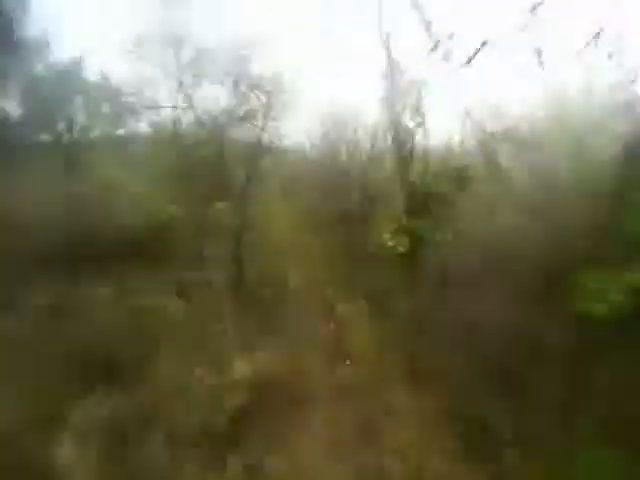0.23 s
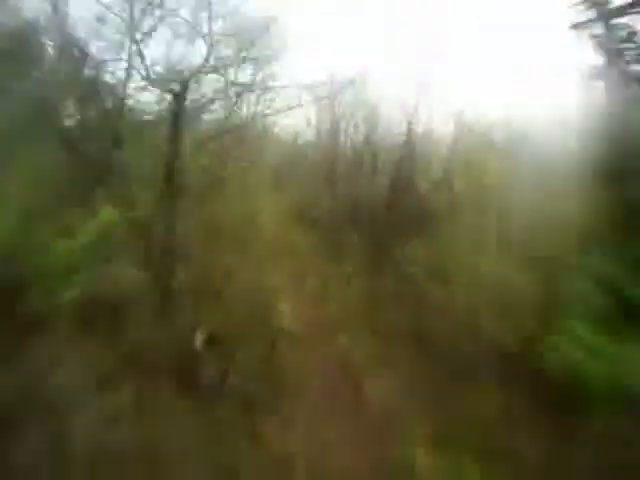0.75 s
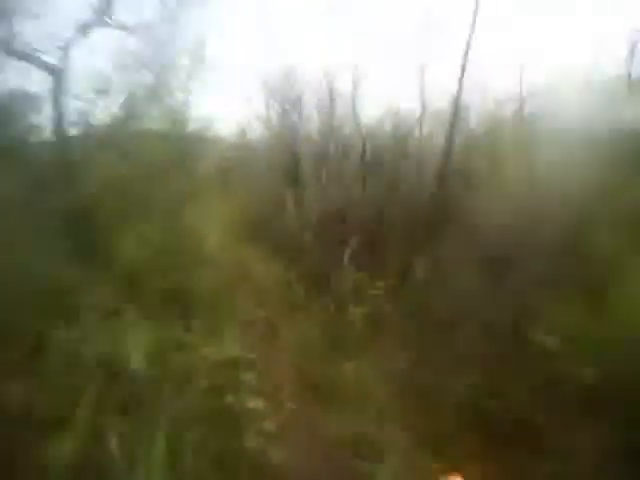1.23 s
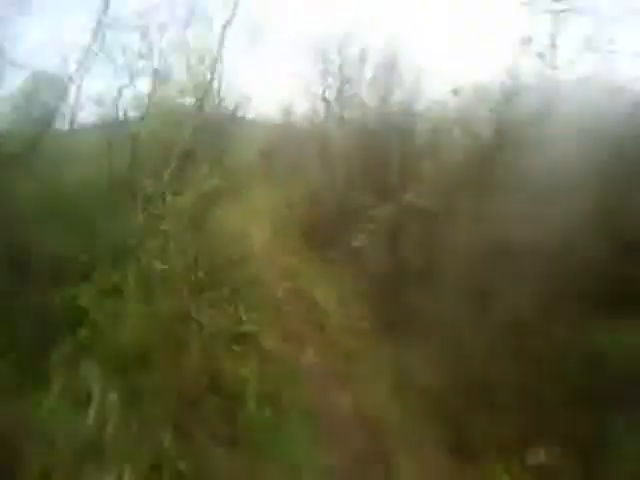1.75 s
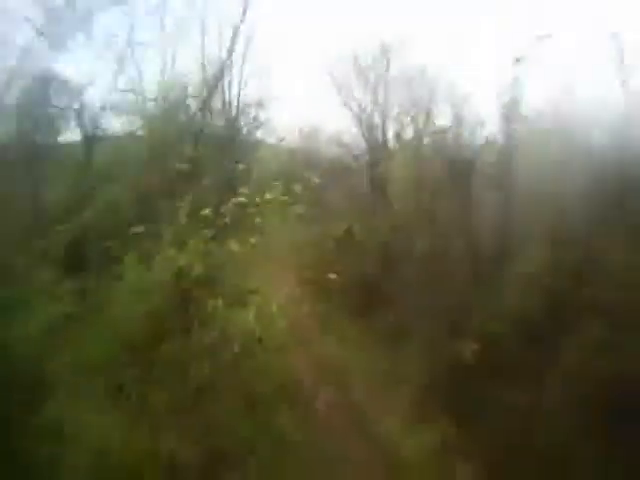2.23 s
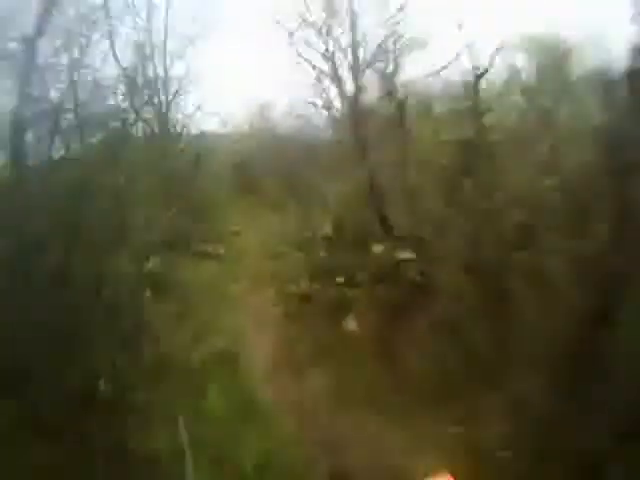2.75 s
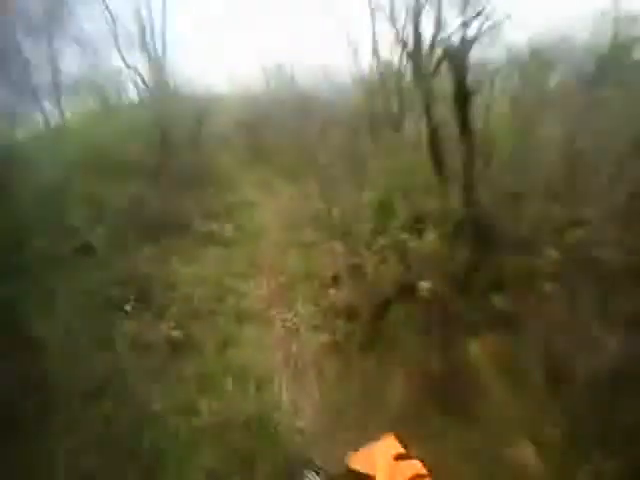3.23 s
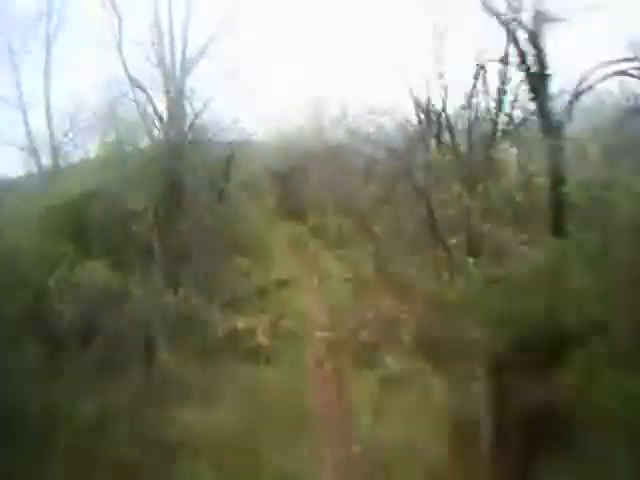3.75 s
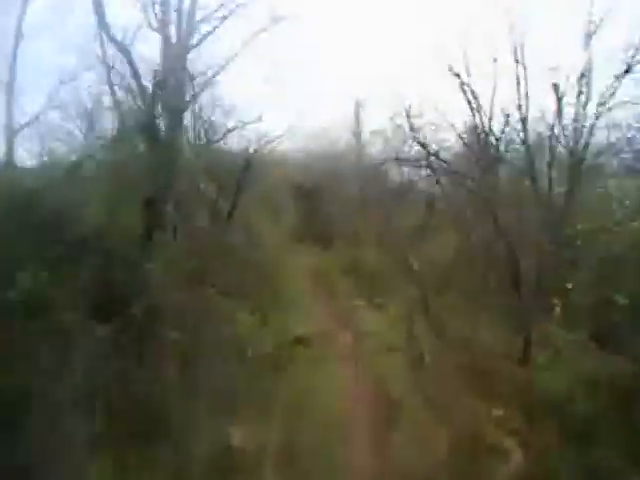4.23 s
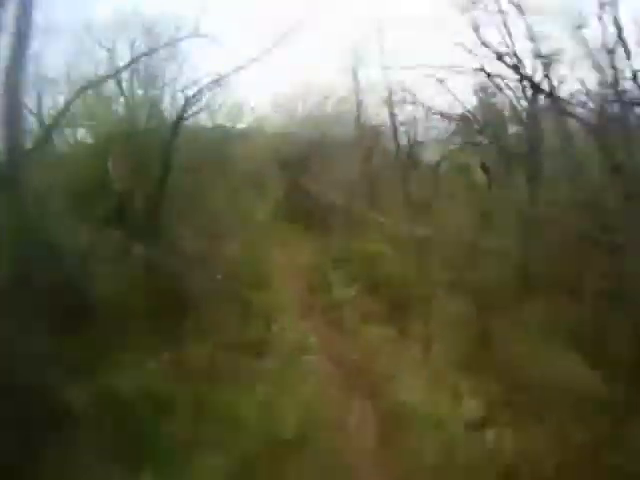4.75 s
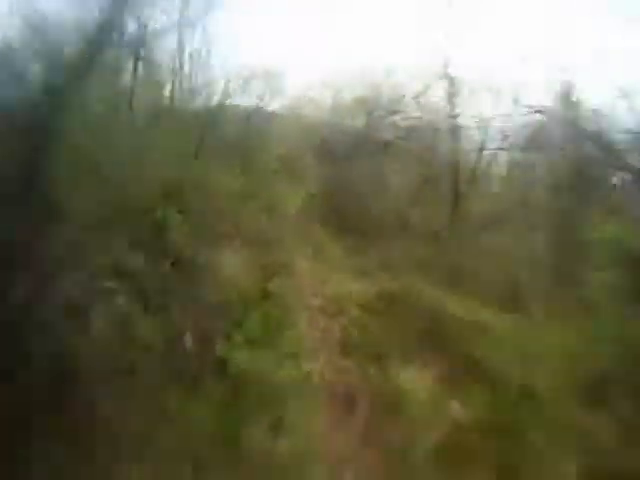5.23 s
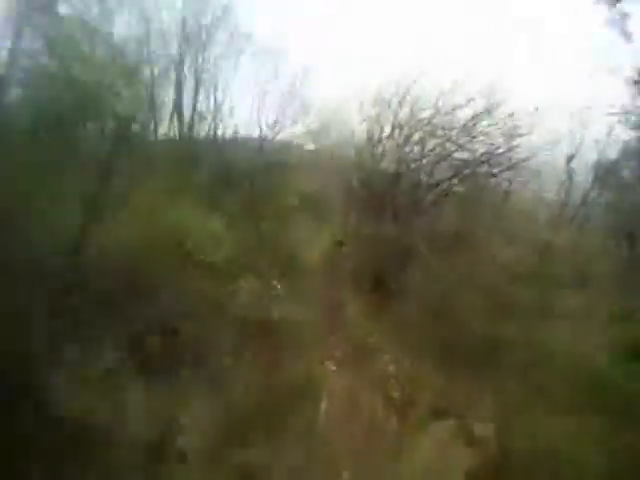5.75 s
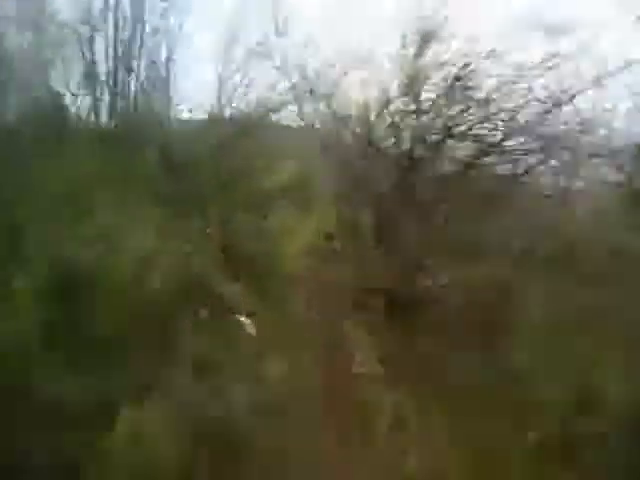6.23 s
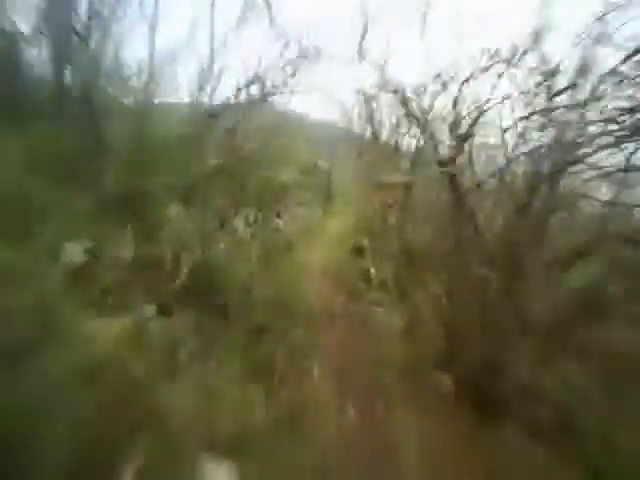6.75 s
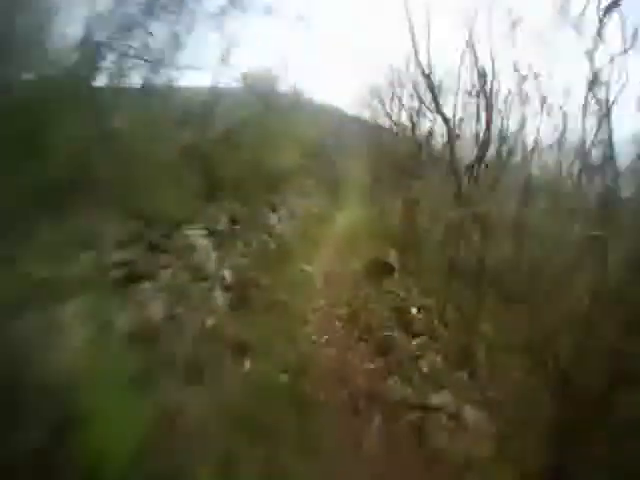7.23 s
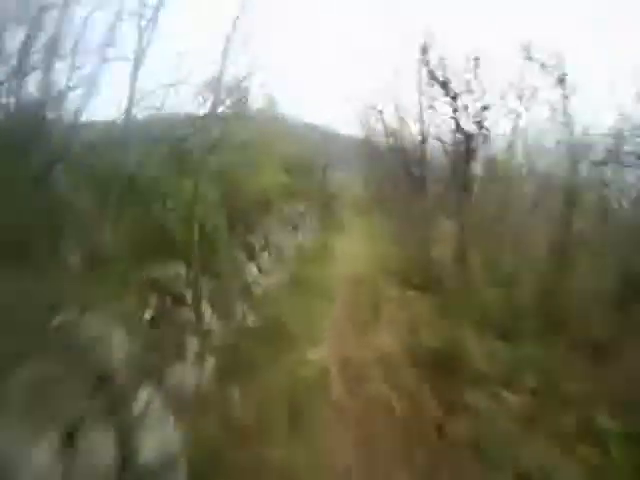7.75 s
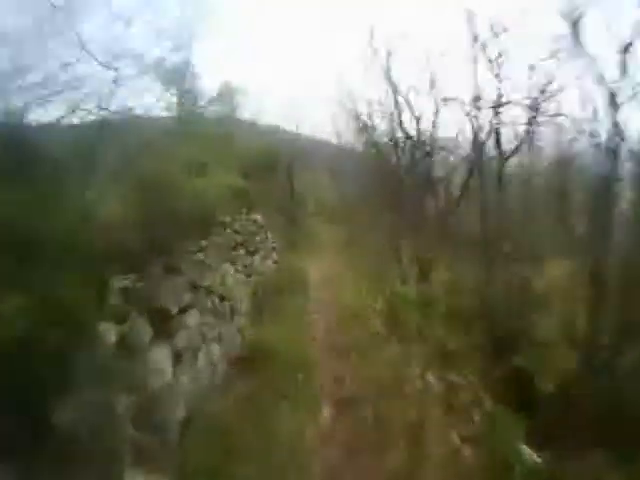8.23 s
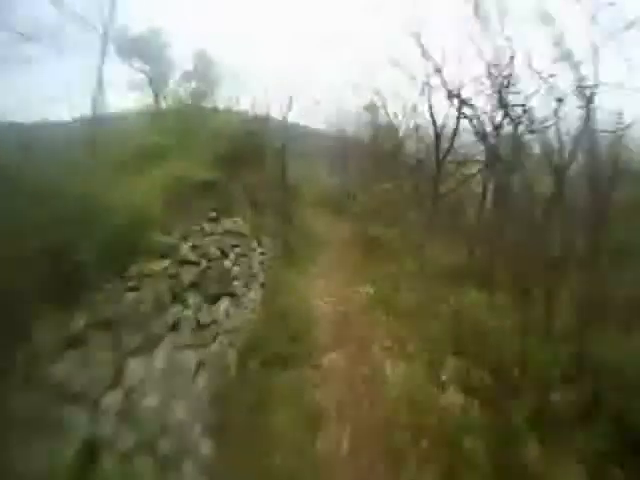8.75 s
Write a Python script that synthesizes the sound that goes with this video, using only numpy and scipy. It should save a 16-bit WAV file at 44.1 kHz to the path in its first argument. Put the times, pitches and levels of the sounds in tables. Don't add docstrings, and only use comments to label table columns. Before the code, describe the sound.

A small microphone inside a closed plastic case rides on a helmet along an overgrown trail. Low muffled wind, a soft uneven throb of about 26 beats a second and a faint, dull hiss of brush run throughout. Sparse leaf ticks lead to a light twig flick and thud at 1.4 seconds. From 2.58 to 2.75 twigs whip the case and helmet in a loud, hollow rattle with deep mount thumps and a rush of brush. A bright snap comes at 2.96, more scraping and knocks at 3.1-3.26. Riding rumble continues until a sharp double crack at 5.03. At 6.56-6.61 another hard rattle hits, followed by heavy booming jolts near 6.9-6.97, clipped and crackling with tiny dropouts. Single hard knocks land at 7.22 and 7.56, the latter with a brief swish. Gusts thump around 8.05, then rumble, throb and faint rustle carry on to 9.

```python
import sys
import numpy as np
from scipy import signal
from scipy.fft import rfft, irfft
from scipy.io import wavfile
from scipy.ndimage import uniform_filter1d

SR = 44100
rng = np.random.default_rng(int(sys.argv[2]) if len(sys.argv) > 2 else 0)


def generate_wav(sig):
    pcm = np.round(np.clip(np.atleast_2d(sig).T, -1, 1) * 32767).astype(np.int16)
    wavfile.write(sys.argv[1], SR, pcm)


def gain_from_db(level_db):
    decades = np.asarray(level_db, float) / 20
    return 10 ** decades


N = 396459
TIME = np.arange(N) / SR

# [f/Hz, width/Hz, level/dB]
CASE_MODES = [(1234, 780, -9), (1580, 230, 1.5), (1956, 140, -4), (2352, 241, -2), (2785, 510, -5.5),
              (3460, 590, -7.5), (4400, 230, -31.5)]
# [t/s, rumble level/dB, fade either side/ms, brush nearer by/dB]
BRANCH_SWEEPS = [(1.42, -57, 47, 1.5), (2.64, -32, 14.4, 16), (3.131, -35.5, 26, 2.5), (3.22, -37, 70, 15),
                 (6.85, -42, 27, 4), (7.56, -26.5, 11, 15)]


def unit(x):
    return x / np.sqrt(np.mean(x ** 2))


def ring(x, hz, width_hz):
    return signal.lfilter(*signal.iirpeak(hz, hz / width_hz, fs=SR), x)


def ring_case(x):
    return sum(gain_from_db(db) * ring(x, hz, width_hz) for hz, width_hz, db in CASE_MODES)


def coloured(shape):
    hz, db = np.transpose(shape)
    bins = np.arange(N // 2 + 1) * SR / N + 1
    gain = gain_from_db(np.interp(np.log(bins), np.log(hz), db))
    return unit(irfft(rfft(rng.standard_normal(N)) * gain, N))


def walk(rate):
    k = int(SR / rate)
    steps = np.repeat(rng.standard_normal(N // k + 1), k)
    return unit(uniform_filter1d(uniform_filter1d(steps, k), k)[:N])


def crest(s, ms):
    return np.exp(-np.abs(TIME - s) * 1000 / ms)


def loudest(x, db, size):
    return x * gain_from_db(db) / np.sqrt(uniform_filter1d(x ** 2, size).max())


def add(out, s, x):
    i = int(s * SR)
    out[i:i + len(x)] += x[:N - i]


def contacts():
    # [t/s, case level/dB, contact/ms, f/Hz]
    flicks = [(1.392, -30.5, 1.9, 2400), (2.7722, -34.5, 13, 2400), (2.9542, -17.5, 2.2, 2400),
              (2.956, -3, 4.5, 2400), (2.9628, -8.5, 3.2, 2420), (3.116, -24, 8.2, 2400),
              (3.133, -25, 7, 2500), (3.159, -26, 6.7, 2330), (3.1829, -21.5, 11.5, 2620),
              (3.2228, -11, 4.4, 3010), (3.234, -20, 4, 2920), (3.2405, -23, 4.7, 2500),
              (3.2513, -24.5, 3.3, 2490), (3.262, -34.5, 3.5, 2400), (5.018, -6, 4.3, 1969),
              (5.0193, -3.5, 4, 2930), (5.0413, -6.5, 6.7, 2274), (5.0499, -11, 4.1, 2790),
              (5.056, -37, 3, 2500), (6.5613, -34, 4.1, 2200), (6.6062, -20, 4, 2900),
              (6.91, -31.5, 7, 2600), (7.2189, -14.5, 5.1, 1635), (7.969, -46, 16, 1730),
              (7.554, -14.5, 5.7, 1554)]
    # [t/s, case level/dB, contact/ms, shell level/dB]
    whips = [(1.4112, -30.5, 3.4, -37), (1.5482, -46, 9, -57), (1.7993, -46, 15, -51.5),
             (2.35, -45, 5, -47), (2.5787, -7.5, 6.6, -5.5), (2.583, -19.5, 12, -9), (2.6, -15, 2.1, -14),
             (2.603, -1.5, 7, -15), (2.611, -13, 5.5, -12.5), (2.622, -19.5, 0.94, -10),
             (2.6658, -15.5, 5.6, -18), (2.7, -12, 0.64, -17), (2.712, -11.5, 6, -17),
             (2.737, -44, 36, -26.5), (3.121, -37.5, 8.3, -19), (3.2062, -26.5, 7.8, -23),
             (6.96, -33, 0.57, -47), (5.0304, -10, 6, -14), (6.5672, -14, 2.6, -21.5),
             (6.5695, -6.5, 5.1, -12), (6.576, -12, 6, -12.5), (6.583, -6.5, 10.34, -3.5),
             (6.59, -13.5, 5.7, -16.5), (6.6014, -15, 5.6, -27), (6.8872, -41, 0.86, -54),
             (7.553, -9.5, 4.1, -18.5), (7.5577, -12.5, 6.5, -14)]
    # [t/s, case level/dB, contact/ms, knock level/dB]
    thuds = [(1.395, -25, 2.9, -24), (1.402, -47, 27, -29), (2.647, -19.5, 7, -39),
             (2.6516, -19.5, 8, -20.5), (2.66, -28.5, 88, -30), (2.664, -32.5, 1.3, -21),
             (2.683, -23, 2.7, -25), (2.6891, -26, 4.3, -16), (2.7209, -23.5, 8.8, -22.5),
             (2.7347, -21.5, 8.9, -24), (2.967, -24, 5.5, -34), (3.1004, -45.5, 19, -28),
             (3.1182, -38, 3.7, -24.5), (3.126, -29.5, 22, -40.5), (3.1316, -40.5, 4.9, -28),
             (3.1945, -32.5, 1.6, -15.5), (3.1994, -15, 10.8, -11.5), (3.199, -27, 59, -29),
             (3.2107, -14.5, 6.5, -16), (3.2613, -42.5, 6.6, -29), (6.823, -42.5, 2.6, -34.5),
             (6.8744, -31, 4.7, -25), (6.877, -39, 61.6, -28), (6.8983, -31.5, 11, -29.5),
             (6.9066, -34.5, 8.4, -28), (6.934, -40, 1.9, -48), (6.9512, -31, 3.5, -27),
             (6.9612, -32.5, 1.3, -29.5), (7.2176, -10.5, 6.6, -12.5)]
    # [t/s, case level/dB, contact/ms]
    leaves = [(.3073, -56, 2.5), (0.7314, -41.5, 2.6), (1.159, -49, 23), (1.224, -46.5, 3.5),
              (1.2876, -43.5, 13), (1.4673, -46, 23), (1.726, -44.5, 1.9), (2.269, -52, 3.3),
              (5.056, -47, 17), (6.613, -45, 18), (6.7165, -31, 2.8), (6.7648, -44, 9.6), (7.141, -27, 2.2),
              (7.1604, -45, 2.6), (7.228, -43.5, 28), (7.3967, -45.5, 5.1), (7.455, -39.5, 7.3),
              (7.769, -47, 4.9), (7.97, -41, 12), (8.4073, -52, 4.4)]
    rows = [(s, db, ms, hz, db - 32, db - 21) for s, db, ms, hz in flicks]
    rows += [(s, db, ms, 2500, db - 23, db - 10) for s, db, ms in leaves]
    rows += [(s, db, ms, 2600, shell_db, shell_db - 8) for s, db, ms, shell_db in whips]
    rows += [(s, db, ms, 2400, knock_db - 17, knock_db) for s, db, ms, knock_db in thuds]
    return rows


def twigs(rows):
    # [f/Hz, time to fall 60 dB/s, level/dB]
    shell_modes = [(909.7, 0.062, -1.5), (811, 0.043, -7), (653, 0.082, -15.5), (1017, 0.051, -14)]
    focus_hz, tail_ms = 1620.0, 1.0
    snap_db, snap_ms = 15, 0.66
    trail_db, trail_ms = -32, 17.0
    out, t_ms = np.zeros(N), np.arange(4096) / SR * 1000
    noise = rng.standard_normal((len(rows), 3, len(t_ms)))
    for (s, case_db, ms, hz, shell_db, knock_db), (scrape, push, rub) in zip(rows, noise):
        touch = np.tanh(t_ms / 0.1) * np.exp(-np.maximum(t_ms - 0.97 * ms, 0) / tail_ms)
        touch = touch + gain_from_db(trail_db) * np.exp(-t_ms / trail_ms)

        broad = gain_from_db(.9 * np.clip(max(shell_db, knock_db) - case_db, -24, 0))
        width_hz = focus_hz * broad ** .5
        chatter = np.tanh(unit(ring(ring(scrape, hz, width_hz), hz, width_hz)))
        chatter = chatter + gain_from_db(8.5) * broad * scrape
        snap = gain_from_db(snap_db) * broad ** .5 * scrape * np.exp(-t_ms / snap_ms)
        force = chatter * touch + snap

        case = sum((-1) ** k * gain_from_db(db) * ring(force, f, w) for k, (f, w, db) in enumerate(CASE_MODES))
        blow = ring(push * touch, 880., 700.)
        shell = sum(gain_from_db(db) * ring(blow, f, np.log(1000) / np.pi / t60) for f, t60, db in shell_modes)
        knock_hz = 80.0 + 255.0 / ms
        knock = ring(ring(rub * touch, knock_hz, 7.5 * knock_hz), knock_hz, 2.8 * knock_hz)

        add(out, s, loudest(case, case_db, size=90))
        add(out, s, loudest(shell, shell_db, size=130))
        add(out, s, loudest(knock, knock_db, size=300))
    return out


def mount():
    # [t/s, peak level/dB, f/Hz, time to fall 60 dB/s, direction of first swing (+1 or -1)]
    swings = [(1.401, -19, 81.2, 0.2, 1), (2.634, -9, 74.7, 0.41, 1), (2.677, -3.5, 99, 0.13, -1),
              (2.699, -7.5, 78, 0.23, 1), (2.968, -13, 77, 0.046, 1), (3.052, -27, 74, 0.23, 1),
              (3.112, -27.5, 77, 0.4, 1), (3.197, -20.5, 71, 0.47, 1), (5.029, -11.5, 73.3, 0.18, 1),
              (6.605, -17, 76, 0.1, 1), (6.696, -17, 43.9, 0.11, -1), (6.829, -26, 61, 0.12, -1),
              (6.893, -20, 55.3, 0.089, 1), (6.909, -0.5, 114, 0.016, -1), (6.925, -8.5, 59.6, 0.071, -1),
              (6.955, -4.5, 70, 0.05, 1), (6.9586, 0, 79.7, 0.06, -1), (7.2244, -14, 77.3, 0.24, 1),
              (7.561, -6.5, 79.5, .2, -1), (4.564, -22.5, 26.3, 0.69, -1), (8.013, -23, 45.2, 0.11, -1),
              (8.039, -15.5, 29.5, 0.17, -1)]
    out, t = np.zeros(N), np.arange(SR // 2) / SR
    for s, db, hz, t60, sign in swings:
        fade = np.exp(-np.log(1000) * t / t60)
        add(out, s, np.sign(sign) * gain_from_db(db) * np.sin(2 * np.pi * hz * t) * fade)
    return out


def buffeting():
    # [t of the crest/s, level/dB, fade either side/ms]
    gusts = [(0, -26.5, 15), (.45, -33.5, 150), (.85, -35.5, 80), (1.1, -37, 150), (1.42, -37, 68),
             (1.75, -34, 110), (2.2, -44.5, 180), (2.6, -11, 10), (2.73, -26, 66), (3.05, -33, 120),
             (3.199, -28, 110), (3.29, -33, 55), (4.2, -36, 78), (4.58, -25, 23), (5.049, -42, 100),
             (5.28, -39, 47), (5.43, -38, 170), (5.83, -39, 80), (6.072, -33.5, 51), (6.55, -37, 180),
             (6.712, -27.5, 80), (6.84, -26, 70), (6.98, -23.5, 40), (7.34, -22, 50), (7.56, -25, 75),
             (7.69, -32.5, 90), (8.049, -25, 108), (8.48, -31, 55), (8.75, -29, 82), (8.99, -24, 39)]
    calm_db = -44.5
    strength = gain_from_db(calm_db) + sum(gain_from_db(db) * crest(s, ms) for s, db, ms in gusts)
    buffet = coloured([(4, -18.5), (14, 9.5), (28, -5.5), (45, -11.5), (80, -17), (200, -98)])
    buffet = buffet / np.sqrt(uniform_filter1d(buffet ** 2, size=3500))
    return strength * buffet


def throb():
    # [t/s, beats per second/Hz]
    pace = [(0.0, 24.4), (0.25, 26.5), (0.37, 26.7), (2.78, 26.7), (3.13, 26.1), (3.46, 26.7), (4.63, 26.7),
            (4.9, 27.1), (5.18, 26.1), (5.46, 26.2), (5.76, 26.7), (6.51, 26.7), (6.66, 26.4), (6.93, 24.3),
            (7.08, 24.2), (7.59, 24.2), (7.91, 26.7), (8.99, 26.7)]
    jitter, scatter_db, puff_db = .04, 1.0, -3
    turns = np.cumsum(np.interp(TIME, *np.transpose(pace))) / SR
    starts = np.flatnonzero(np.diff(np.floor(turns))) / SR
    out, t = np.zeros(N), np.arange(1024) / SR
    chance = rng.standard_normal((len(starts), 3))
    noise = rng.standard_normal((len(starts), len(t)))
    for s, (late, size, wide), n in zip(starts, chance, noise):
        u = (t - .008) / (0.0021 * gain_from_db(1.2 * wide))
        push = (1 - u ** 2) * np.exp(-u ** 2 / 2)
        puff = unit(ring(ring(n, 200.0, 170.0), 190.0, 250.0)) * np.exp(-((t - .008) / .004) ** 2)
        beat = gain_from_db(scatter_db * size) * (push + gain_from_db(puff_db) * puff)
        add(out, max(s + late * jitter / 26, 0), beat)
    return unit(out)


def rumble():
    # [f/Hz, level per Hz/dB]
    wind_shape = [(24, -38), (40, -1.5), (49, -1.5), (80, 4.5), (145, -3.5), (760, -22), (822, -18.5),
                  (900, -19.5), (1170, -61.5), (1980, -120)]
    strength = gain_from_db(-48 + 0.4 * walk(17))
    strength = strength + sum(gain_from_db(db) * crest(s, ms) for s, db, ms, _ in BRANCH_SWEEPS)
    wind = gain_from_db(0.77 * walk(14)) * coloured(wind_shape)
    return strength * (wind + gain_from_db(-3.5) * throb())


def brush():
    # [f/Hz, level per Hz/dB]
    hiss_shape = [(290, -31.5), (500, -12), (576, -11), (764, 0), (823, -4.5), (1070, -1), (1750, -2),
                  (1990, -3), (2450, -6.5), (2820, -4), (3600, -9.5), (4740, -29.5), (6160, -65.5),
                  (10400, -120)]
    # [t/s, level/dB]
    nearness = [(0, -53.5), (.4, -58.5), (1.3, -56.5), (1.75, -54.5), (2.08, -58.5), (2.25, -55.5),
                (3.3, -58), (3.65, -60.5), (4.5, -59), (5.1, -58), (6.3, -59.5), (6.7, -56), (7.1, -58.5),
                (7.72, -55), (8.15, -55.5), (8.42, -53.5), (8.7, -56), (8.99, -56)]
    near_db = np.interp(TIME, *np.transpose(nearness)) + walk(8) / 2
    near_db = near_db + sum(db * crest(s, ms) for s, _, ms, db in BRANCH_SWEEPS)

    ticks = (rng.random(N) < 60 / SR) * gain_from_db(3.5 * np.minimum(rng.exponential(size=N), 2))
    ticks = signal.lfilter([1], [1, -.99], ticks) * rng.standard_normal(N)
    ticks = unit(ring(ring_case(ticks), 2500., 1700.0))

    rustle = unit(ring(ring_case(rng.standard_normal(N)), 2520, 650))
    rustle = unit(ring(rustle, 2600, 1300))

    hiss = gain_from_db(-59.5) * coloured(hiss_shape) * gain_from_db(0.81 * walk(17))
    swell = gain_from_db(1.84 * (near_db + 56.5))
    return hiss + swell * (gain_from_db(-70) * ticks + gain_from_db(-61.0) * rustle)


def scene():
    return (twigs(contacts()) + mount() + buffeting() + rumble() + brush())[None]


def roll_off(x):
    return signal.sosfilt(signal.butter(12, 10300, fs=SR, output="sos"), x)


def record(dry):
    # [start t/s, end t/s, level of hiss left/dB]
    gaps = [(6.6915, 6.697, -30), (6.9395, 6.953, -3), (7.0095, 7.014, -25)]
    hiss = ring(ring(dry, 1280.0, 3500.), 1260.0, 3700.0)
    x = dry
    for start, end, hiss_db in gaps:
        gap = uniform_filter1d(1. * ((TIME > start) & (TIME < end)), size=40)
        x = (1 - gap) * x + gap * gain_from_db(hiss_db) * hiss

    fold_s, fold_ms, fold_level, splinter_db = 6.9622, .4, .1, -22
    fold = (TIME > fold_s) & (TIME < fold_s + fold_ms / 1000)
    x = np.where(fold, fold_level, np.clip(x, -.61, .61))
    x = signal.sosfilt(signal.cheby1(10, .3, 4700, fs=SR, output="sos"), x)
    x = x + gain_from_db(splinter_db) * fold
    clipped = np.clip(x, -.7, .7)

    haze = rng.standard_normal(N) * np.sqrt(np.abs(uniform_filter1d((x - clipped) ** 2, size=1500)))
    lowpass = signal.ellip(8, .2, 60, 10100, fs=SR, output="sos")
    return roll_off(signal.sosfilt(lowpass, clipped + gain_from_db(-11.0) * haze))


dry = scene()
out = record(dry)
generate_wav(out)
```